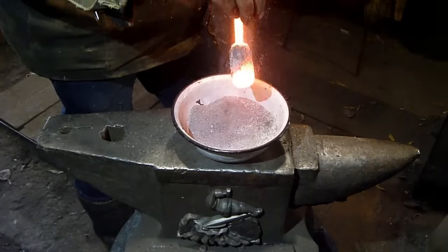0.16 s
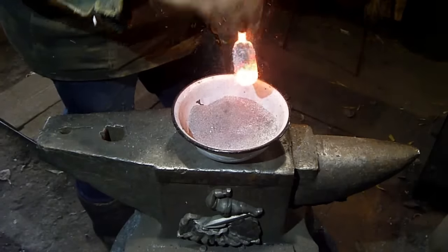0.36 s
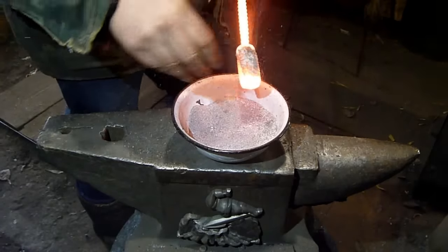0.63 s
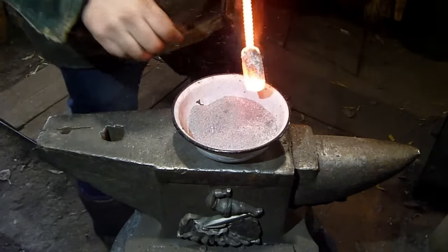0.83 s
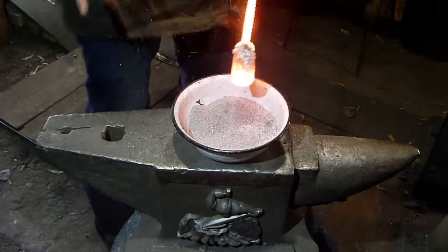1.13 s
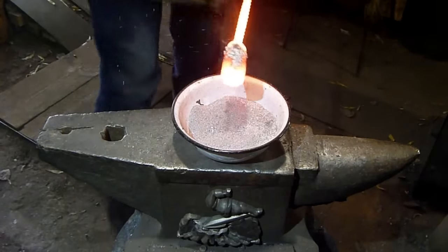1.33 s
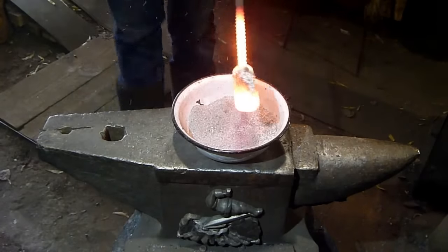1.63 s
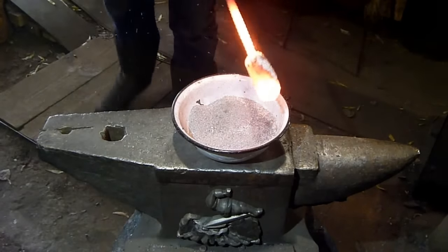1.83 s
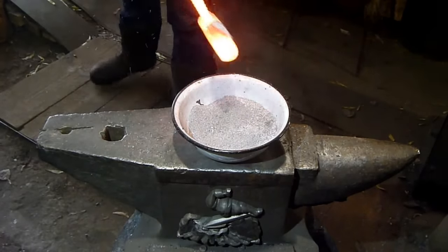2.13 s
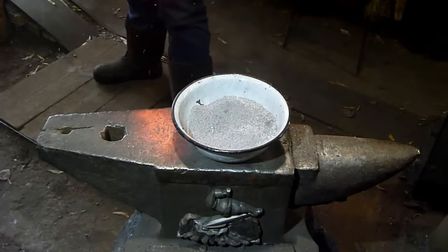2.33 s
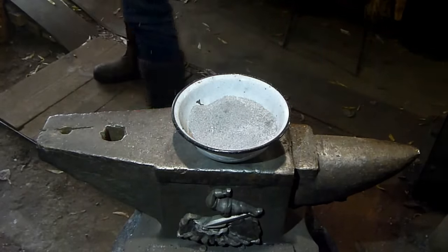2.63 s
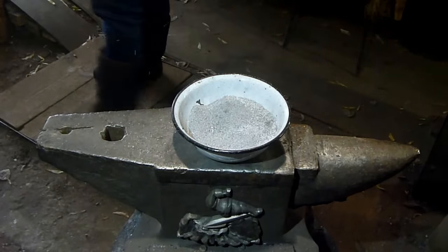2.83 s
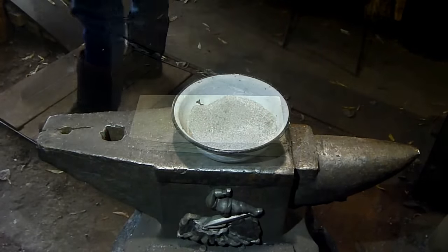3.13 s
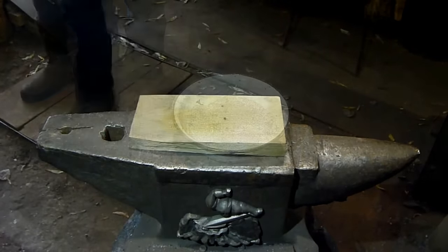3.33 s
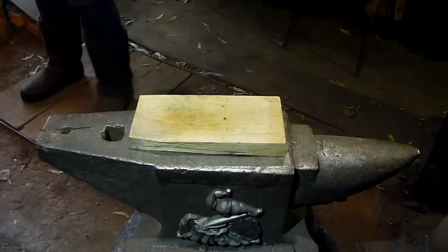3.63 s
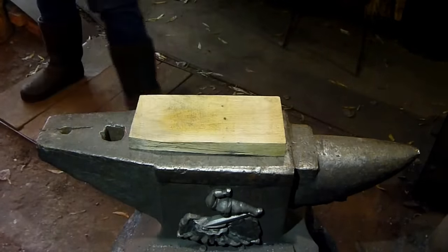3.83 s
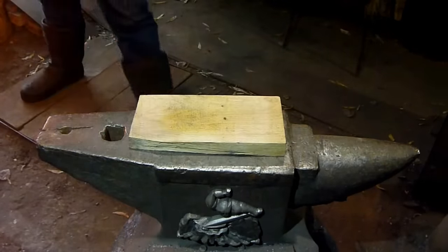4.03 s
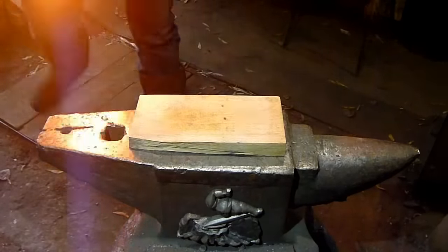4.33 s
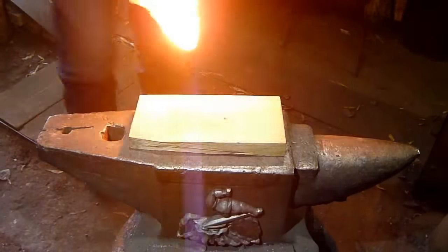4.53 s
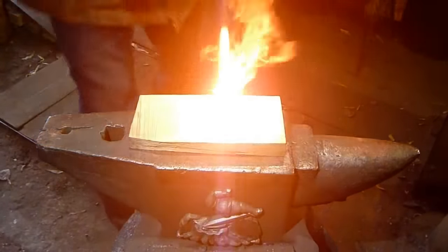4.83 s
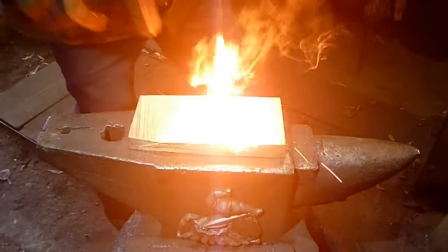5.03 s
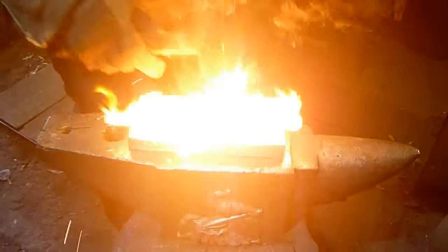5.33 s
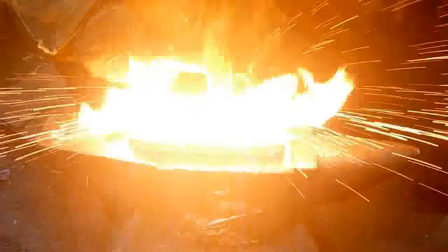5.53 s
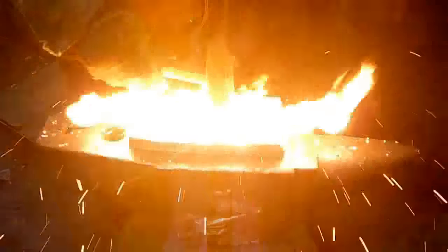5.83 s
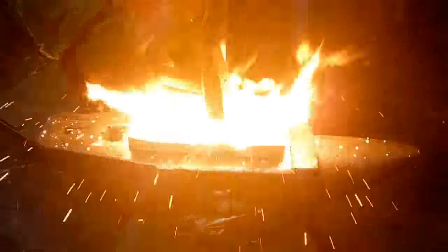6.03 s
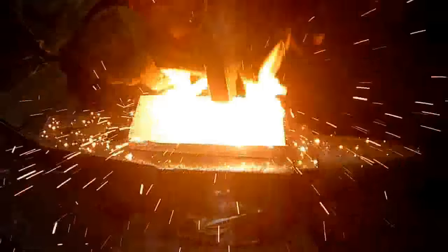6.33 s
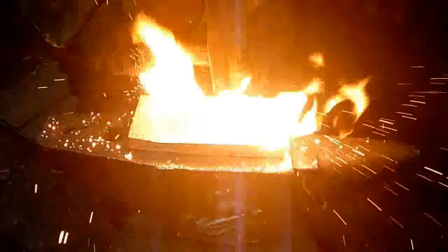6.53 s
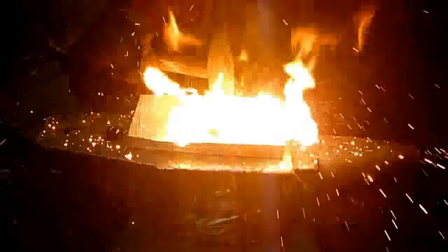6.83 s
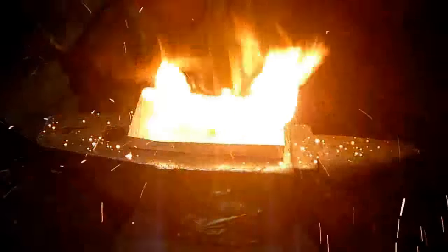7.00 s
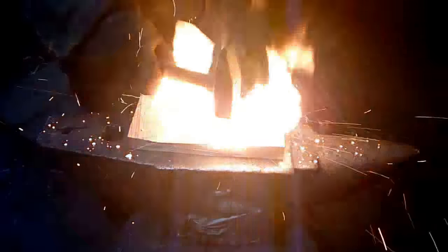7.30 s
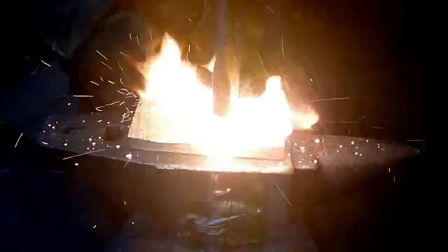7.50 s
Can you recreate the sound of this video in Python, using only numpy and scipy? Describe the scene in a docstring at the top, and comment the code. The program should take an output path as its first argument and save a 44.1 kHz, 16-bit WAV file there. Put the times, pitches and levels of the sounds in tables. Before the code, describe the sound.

Continuous deep furnace roar fills a small workshop for over five seconds, fluttering a little. A tiny dry tick passes, then scorching wood swells into a fine sizzle and crackling spits. Rapid, regular hammering follows to the end: loud, dry, damped clacks on hot metal over a board, barely ringing, each a little different, with rattling scale and short reflections. One close, narrow-band, slightly overloaded microphone whose automatic gain pushes the forge down.

```python
"""A blown forge roars steadily in a small smithy, close to one microphone: noise through the hearth's resonances.
A faint dry tick falls at 3.3 s; then white-hot iron on a board on the anvil sizzles (random clicks) and spits.
From 5.4 s a hammer strikes it five times a second. The board deadens the anvil, so each blow is a short clack:
damped modes, a crack and crushed scale, with echoes and room. The gain control turns the forge down under the blows."""
import sys
import numpy as np
from scipy import signal
from scipy.fft import rfft, irfft, next_fast_len
from scipy.io import wavfile
from scipy.ndimage import uniform_filter1d, minimum_filter1d, map_coordinates

SR = 44100
rng = np.random.default_rng(int(sys.argv[2]) if len(sys.argv) > 2 else 0)


def unload_wav(signal):
    """Save mono or channel-first audio to the path in sys.argv[1] as 16-bit WAV at rate SR, clipped to [-1, 1]."""
    wavfile.write(
        sys.argv[1],
        SR,
        np.round(np.clip(np.atleast_2d(signal).T, -1, 1) * 32767).astype(np.int16),
    )


N = 337806

# Hammer blows. Each row: start in seconds, level in dB, hardness of the contact in dB, crack in dB,
# thud of the board in dB, spot struck along the iron from -1 to 1, room in dB.
BLOW_LIST = [(5.438, -14.5, -3.5, 8, 2, .8, -12), (5.638, -14, -2, 11, 4, .6, -8),
             (5.8344, -11.5, -3.5, 4.5, 2, 0.79, -10.5), (6.039, -5.5, 0.5, 2.5, -4, -0.58, -5.5),
             (6.2264, -4.5, 3, -4, -7, 0.85, -3.5), (6.4256, -10.5, -10.5, -9, 2.5, -0.74, -2.5),
             (6.634, -5.5, 1.5, 11, 14.5, -.8, -5.5), (6.8333, -6.5, -9, -6, 1, -.6, -3.5),
             (7.0441, -6.5, -3, 0.5, 9.5, -0.28, -5), (7.241, -7, -10, 0, -5, .7, -6.5),
             (7.4498, -5.5, 7, -0.5, -7, -0.98, -6)]
# What the smithy's surfaces reflect. Each row: frequency in Hz, reflectance in dB.
WALL_REFLECTANCE = [(200, -8.5), (800, -3), (1450, 0.5), (1750, -4.5), (1950, 0), (2200, -4.5), (2900, -5),
                    (3300, -10), (4200, -4.5), (4700, -8), (7000, -10)]


def amp(db):
    """Decibels to gain."""
    return 10 ** (np.asarray(db) / 20)


def unit(x):
    """x at rms 1."""
    return x / np.sqrt(np.mean(x ** 2) + 1e-20)


def along(points, hz):
    """Rows of frequency and value, read at hz on a log frequency axis."""
    point_hz, values = np.transpose(points)
    return np.interp(np.log(hz + 1), np.log(point_hz + 1), values)


def curves(rows):
    """One value per sample for each column after the time."""
    s, *columns = np.transpose(rows)
    return [np.interp(np.arange(N) / SR, s, column) for column in columns]


def wobble(rate):
    """A smooth random curve with rate knots a second."""
    knots = rng.standard_normal(int(N * rate / SR) + 4)
    return map_coordinates(knots, [np.arange(N) * rate / SR])


def filtered(x, response):
    """x shaped by a gain that is a function of frequency."""
    size = next_fast_len(len(x) + 8192)
    spectrum = rfft(x, size) * response(np.fft.rfftfreq(size, 1 / SR))
    return irfft(spectrum, size)[:len(x)]


def noise(spectrum, resonances=(), size=N):
    """Noise of rms 1: a smooth spectrum with steep-sided resonances standing on it, powers added."""
    def response(f):
        power = amp(along(spectrum, f)) ** 2
        for hz, width, db in resonances:
            power = power + (amp(db) / (1 + ((f - hz) / width * 1.89) ** 2)) ** 2
        return np.sqrt(power)
    return unit(filtered(rng.standard_normal(size), response))


def grains(spectrum, per_s, size=N):
    """Tiny random clicks of one colour, about per_s a second, at rms 1."""
    clicks = rng.standard_normal(size) * (rng.random(size) < per_s / SR)
    return unit(filtered(clicks, lambda f: amp(along(spectrum, f))))


def tones(lines, drift_hz):
    """Steady tones, each drifting a little in pitch."""
    total = np.zeros(N)
    for hz, db in lines:
        phase = 2 * np.pi * np.cumsum(hz + drift_hz * wobble(8)) / SR
        total += np.sqrt(2) * amp(db) * np.sin(phase)
    return total


def fade(t, t60):
    """A decay of 60 dB in t60 seconds."""
    return np.exp(-np.log(1000) * t / t60)


def add(track, s, sound):
    """Mix a sound into the track from time s."""
    part = track[round(s * SR):][:len(sound)]
    part += sound[:len(part)]


def forge():
    """Air rushes through the coals and drives the hearth's resonances, the upper ones most uneven; the blower sings."""
    # Uneven level of the roar and rush, with abrupt jumps and dips. Each row: time in seconds,
    # level in dB (only departures from the mean of the rows count).
    uneven_level = [(0.0, -33), (1.29, -36), (1.34, -32.5), (1.39, -36.5), (1.43, -33.5), (1.46, -43.5),
                    (1.49, -31), (1.56, -41.5), (1.71, -34), (2.98, -33.5), (3.14, -37), (3.22, -32.5),
                    (3.29, -35.5), (4.15, -33), (4.2, -37), (4.68, -32), (4.75, -36.5), (5.25, -35)]
    # Brief dips and one rise in the roar's level. Each row: centre in seconds, half-length in seconds, change in dB.
    level_dips = [(1.274, 0.02, -2.5), (1.649, 0.028, -5.5), (5.62, 0.017, 4), (5.88, .025, -3.5),
                  (6.61, 0.025, 0)]
    # Gradual changes of the roar's level. Each row: time in seconds, change in dB.
    roar_ease = [(4.7, -2.5), (5.4, -2.35), (6.6, -1.5), (7.1, -3)]
    # Turbulence under the resonances. Each row: frequency in Hz, relative dB per Hz.
    turbulence = [(20, -36), (40, -38.5), (90, -42.5), (130, -25), (400, -26.5), (600, -25), (900, -31),
                  (1300, -51), (2000, -81.5)]
    # Resonances of hearth, hood and blower duct. Each row: frequency in Hz, width in Hz, relative dB per Hz.
    hearth_modes = [(69.5, 5.7, -13.5), (107, 15, -16.5), (134.8, 27.5, -4), (156, 14, -4),
                    (175.2, 14.3, -0.5), (203.4, 17, -6), (223, 63, -11), (254.9, 16, 0.5),
                    (300.5, 13.8, 2.5), (321.6, 32, -1.5), (366, 89, -11.5), (383.4, 17, -5),
                    (413.5, 19, -6.5), (440, 110, -16), (464, 11, -9), (502.6, 13.9, -7), (535.8, 21, -9),
                    (588.5, 35, -18.5), (631.3, 17, -14.5), (676, 30, -18), (726, 29, -17.5),
                    (772, 61, -25.5), (851.4, 14, -18)]
    # Air rushing through the coals. Each row: frequency in Hz, relative dB per Hz.
    coal_rush = [(400, -32), (900, -2.5), (1150, 0.5), (1450, -6), (1950, -7.5), (2350, -11), (2950, -12.5),
                 (3300, -16), (4100, -18), (4700, -27.5), (6000, -37.5), (8000, -44)]
    # Whistles of the air nozzle. Each row: frequency in Hz, width in Hz, relative dB per Hz.
    nozzle = [(1842, 37, -1.5), (2124, 99, 0)]
    # Blower motor tones. Each row: frequency in Hz, level in dB rms.
    blower = [(50, -61), (849, -63.5), (1695, -64.5), (1965, -71.5), (2105, -61.5), (2420, -67),
              (2456, -62), (3781, -69.5), (4710, -80)]
    deep_grows, upper_grows, rush_grows = 0.39, 1.1, 0.51  # dB gained per dB of the uneven level
    upper_roar_hz = 480

    uneven_db, = curves(uneven_level)
    uneven_db = uneven_db - np.mean([db for s, db in uneven_level])
    uneven_db = uneven_db + 0.29 * wobble(5)  # small random variations are added
    flutter = wobble(11.0)  # the flames shake roar and rush together
    now = np.arange(N) / SR
    dip_db = sum(db * np.exp(-((now - s) / half) ** 2) for s, half, db in level_dips)
    ease_db, = curves(roar_ease)

    hearth = noise(turbulence, hearth_modes)
    upper = filtered(hearth, lambda f: 1 - 1 / (1 + (f / upper_roar_hz) ** 10))
    deep = hearth - upper
    roar = amp(deep_grows * uneven_db) * deep + amp(upper_grows * uneven_db) * upper
    roar = amp(-20.5 + ease_db + dip_db + 0.2 * flutter) * roar

    rush_db = -42.0 + rush_grows * uneven_db + 0.69 * flutter + 0.72 * wobble(25)
    rush = amp(rush_db) * noise(coal_rush, nozzle)
    return roar + rush + tones(blower, drift_hz=2)


def tick(s, db):
    """One faint, dry tick: a one-sided pulse that dies in a few milliseconds."""
    track = np.zeros(N)
    add(track, s, amp(db) * fade(np.arange(SR // 100) / SR, 0.0036))
    return track


def scorching():
    """Hot iron boils the wood: tiny bursts swell to a steady sizzle, then smoulder under the blows; a few sharp spits."""
    # Steady sizzle. Each row: frequency in Hz, relative dB per Hz.
    sizzle_colour = [(300, -21.5), (900, 8.5), (1500, 3), (2200, 0.5), (3000, -6), (4000, -11), (6000, -21),
                     (8000, -32)]
    # Spits of the scorching wood. Each row: start in seconds, level in dB before its decay.
    spits = [(5.241, -41), (5.275, -40), (5.31, -31.5), (5.317, -32), (5.334, -31), (5.342, -37),
             (5.363, -31), (5.392, -37)]
    # Colour of a spit. Each row: frequency in Hz, relative dB per Hz.
    spit_colour = [(300, -14), (900, 3), (1500, 6), (2200, 4), (3000, -6), (4000, -5.5), (6000, -15.5),
                   (8000, -36)]
    full_s, scorch_db, smoulder_db = 5.17, -47.5, -61.5
    rise_db_per_s, fall_db_per_s = 32.5, 65
    bursts_per_s, spit_bursts_per_s, spit_t60_s = 2800, 1800, 0.036

    now = np.arange(N) / SR
    rise_db = rise_db_per_s * np.minimum(now - full_s, 0)
    fall_db = fall_db_per_s * np.maximum(now - BLOW_LIST[0][0], 0)  # from the first blow
    sizzle_db = rise_db + np.maximum(scorch_db - fall_db, smoulder_db)
    track = amp(sizzle_db + 1.6 * wobble(180)) * grains(sizzle_colour, bursts_per_s)
    t = np.arange(SR // 10) / SR
    for s, db in spits:
        add(track, s, amp(db) * fade(t, spit_t60_s) * grains(spit_colour, spit_bursts_per_s, size=len(t)))
    return track


def hammer():
    """Every blow has its own mix of ring, crack, thud and room; lesser contacts hardly crack."""
    # Lesser knocks after some blows: mostly hammer and iron dropping back for a lesser contact, and at 5.442 s
    # # a low thump as the wet wood bursts under the iron. Each row: start in seconds, level in dB, # hardness
    # in dB, thud of the board in dB, spot struck from -1 to 1.
    lesser_knocks = [(5.442, -20.5, -5, 1, .5), (5.853, -23.5, -14, -11, .5), (6.266, -23.5, -13, -12, .3),
                     (6.651, -20, -14, 3, 0), (6.837, -16, -5, -3, -.3), (6.858, -12, 1, -14, 0.45),
                     (7.0765, -22.5, -0.5, -8, 0)]
    upper_db = -1  # modes above 2 kHz and rattle, before the hardness
    track = np.zeros(N)
    for s, db, hard_db, crack_db, thud_db, spot, room_db in BLOW_LIST:
        add(track, s, strike(db, thud_db, upper_db + hard_db, spot, crack_db, room_db))
    for s, db, hard_db, thud_db, spot in lesser_knocks:
        add(track, s, strike(db, thud_db, upper_db + hard_db, spot, crack_db=-17, room_db=-6.5))
    return track


def strike(db, thud_db, upper_db, spot, crack_db, room_db):
    """One contact: crack, crunch and rattle of scale, short ring of iron, board thud, low push of air, echoes, room."""
    # Modes of hammer and iron, damped by the board. Each row: frequency in Hz, relative level in dB,
    # t60 in seconds, dB gained per unit of spot.
    iron_modes = [(1342, -4, 0.023, -5.5), (1430, -7, 0.018, 0), (1534, -5, 0.024, 5),
                  (1897, -9.5, 0.019, 0.5), (2160, -11, 0.0079, -4), (2440, -13.5, 0.018, -3),
                  (2690, -8.5, 0.014, -2), (2866, -5.5, 0.023, -0.5), (2963, -9, .014, 4),
                  (3500, -14, 0.012, 1.5), (3780, -18.5, 0.018, 0), (4320, -19.5, 0.018, 2.5)]
    # Modes of the board. Each row: frequency in Hz, relative level in dB, t60 in seconds.
    board_modes = [(333, -10, 0.03), (510, -3.5, 0.016), (688, -4, 0.014), (916, -6, 0.015)]
    # The contact's crack. Each row: frequency in Hz, relative dB per Hz.
    crack_colour = [(100, -8.5), (400, 5.5), (900, 5.5), (1400, 1.5), (2200, 5), (2900, 1.5), (4200, 0),
                    (5200, -16), (6000, -11), (7200, -20.5), (8000, -38.5)]
    # Scale crushed under the hammer. Each row: frequency in Hz, relative dB per Hz.
    crunch_colour = [(200, -7), (900, 12.5), (1500, 3.5), (2900, 6), (4300, -17.5), (6000, -17),
                     (8000, -32.5)]
    # Loose scale rattling after the contact. Each row: frequency in Hz, relative dB per Hz.
    scale_colour = [(500, -25), (1400, 2), (2200, -4.5), (2900, 6), (3500, -3.5), (5000, -15.5),
                    (8000, -37.5)]
    # Nearby surfaces that throw the blow back. Each row: typical delay in seconds, level in dB.
    echoes = [(.0021, -16), (.0046, -12.5), (0.0172, -23), (0.0242, -23), (.033, -24), (0.047, -20.5)]
    rattle_db, rattle_t60_s, rattle_per_s = -17.5, 0.14, 810
    crack_delay_s = .0007  # the board gives way before the iron is hit home

    t = np.arange(SR // 2) / SR
    # the spot decides which modes speak; a hard contact favours those above 2 kHz
    struck = [(hz, level + spot * lean + upper_db * (hz > 2000), t60) for hz, level, t60, lean in iron_modes]
    iron = ring(struck, t, scatter_db=1.0)
    board = amp(thud_db) * ring(board_modes, t, scatter_db=1.5)
    crack = amp(crack_db + 0.5) * pulse(crack_colour, size=len(t))
    crunch = amp(crack_db / 2 - 2) * fade(t, 0.015) * noise(crunch_colour, size=len(t))
    rattle = grains(scale_colour, rattle_per_s, size=len(t))
    rattle = amp(rattle_db + upper_db) * fade(t, rattle_t60_s) * rattle
    push = -amp(-13) * fade(t, 0.023)

    onset = 1 - np.exp(-t / 0.00038)
    blow = (iron + board + crunch + rattle + push) * onset
    add(blow, crack_delay_s, crack)
    blow = amp(db) * blow / np.sqrt(np.mean(blow[:SR // 256] ** 2))  # the level is that of the first 4 ms

    sound = blow + amp(room_db) * smithy(blow, build_s=0.0023)
    dulled = filtered(blow, lambda f: amp(along(WALL_REFLECTANCE, f)))
    for delay, echo_db in echoes:
        # the smith's body and arm shift the paths from blow to blow
        shifted_s = delay * np.exp(0.074 * rng.standard_normal())
        add(sound, shifted_s, amp(echo_db) * dulled)
    return sound


def ring(modes, t, scatter_db):
    """Damped modes, each struck at a slightly new strength, pitch and phase."""
    detune = 0.009  # typical shift of a mode from blow to blow, as a fraction of its pitch
    total = np.zeros(len(t))
    for hz, db, t60 in modes:
        strength, turn, shift = rng.standard_normal(3)
        wave = np.sin(2 * np.pi * hz * (1 + detune * shift) * t + 0.5 * turn)
        total += amp(db + scatter_db * strength) * fade(t, t60) * wave
    return total


def pulse(spectrum, size):
    """A single sharp minimum-phase pulse of peak 1 with the given spectrum, silent before its start."""
    cepstrum = irfft(np.log(amp(along(spectrum, np.fft.rfftfreq(size, 1 / SR)))), size)
    # folding the cepstrum forward in time packs the energy at the start
    cepstrum[1:size // 2] *= 2
    cepstrum[size // 2:] = 0
    shape = irfft(np.exp(rfft(cepstrum)), size)
    return shape / np.abs(shape).max()


def smithy(x, build_s):
    """The room's answer builds up in a few milliseconds; its bass lingers and its highest treble dies first."""
    # Decay of the room. Each row: frequency in Hz, t60 in seconds before limiting to 0.1-0.5 s.
    room_decay = [(200, 0.45), (1400, 0.17), (3000, 0.3), (7000, -0.1)]
    hz, t, bands = signal.stft(rng.standard_normal(SR // 2), SR, nperseg=256)
    t60 = np.clip(along(room_decay, hz), .1, .5)
    tail = signal.istft(bands * fade(t, t60[:, None]), SR, nperseg=256)[1]
    tail = tail * (1 - np.exp(-(np.arange(len(tail)) / SR / build_s) ** 2))
    tail = tail / np.linalg.norm(tail)
    tail = filtered(tail, lambda f: amp(along(WALL_REFLECTANCE, f)))
    return signal.fftconvolve(x, tail)[:len(x)]


def gain_control(x, ceiling_db, hold_s, release_db_per_s):
    """The gain drops at once when the level passes the ceiling, is held, then climbs back."""
    level_db = 10 * np.log10(np.abs(uniform_filter1d(x ** 2, SR // 256)) + 1e-12)
    needed_db = np.minimum(ceiling_db - level_db, 0)
    hold = int(hold_s * SR) // 2
    held_db = minimum_filter1d(needed_db, 2 * hold + 1, origin=hold - SR // 512)  # looks 2 ms ahead
    climb_db = release_db_per_s * np.arange(N) / SR
    gain_db = climb_db + np.minimum.accumulate(held_db - climb_db)
    return x * amp(uniform_filter1d(gain_db, SR // 1024))


def scene():
    """Forge, scorching board and hammer at one microphone."""
    return (forge() + scorching() + hammer())[None]


def record(dry):
    """A narrow-band recorder with gain control, soft overload, hiss, whine, one tick and a small offset."""
    # Whine of the recorder's electronics. Each row: frequency in Hz, level in dB rms.
    whine = [(6222, -88.5), (6666, -79), (7530, -90.5)]
    mic_hz, top_hz = 7800, 15800  # steep upper limits of the microphone sound and of everything
    x = gain_control(dry[0], ceiling_db=-15.5, hold_s=0.29, release_db_per_s=102.0)
    x = x / (1 + np.abs(x / .32) ** 6) ** (1 / 6)  # soft overload, never beyond 0.32
    x = x + amp(-61.0) * rng.standard_normal(N) + tones(whine, drift_hz=0.56)
    x = filtered(x, lambda hz: 1 / np.sqrt(1 + (hz / mic_hz) ** 100))
    x = x + amp(-81) * noise([(8000, -29), (15000, -19.5)], [(15700, 320, 0.002)])  # a trace of thin, high hiss
    x = x + tick(3.2583, db=-20.0)
    offset = .011
    return (filtered(x, lambda hz: hz < top_hz) + offset)[None]


dry = scene()
out = record(dry)
unload_wav(out)
```